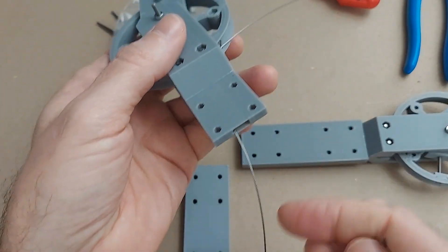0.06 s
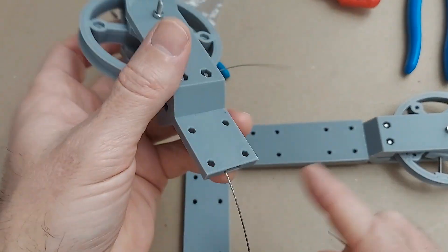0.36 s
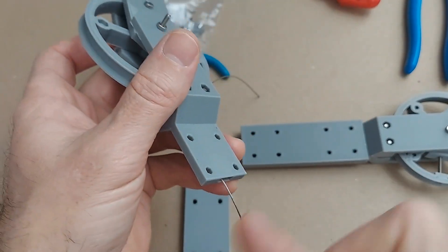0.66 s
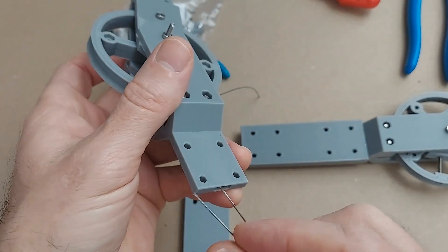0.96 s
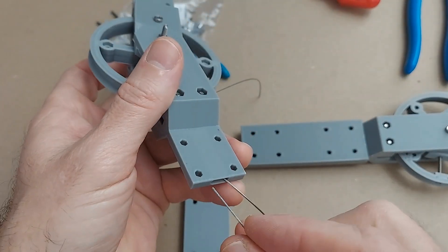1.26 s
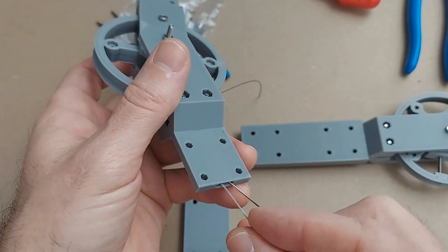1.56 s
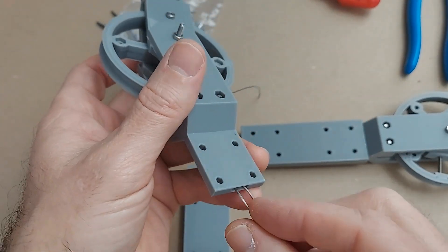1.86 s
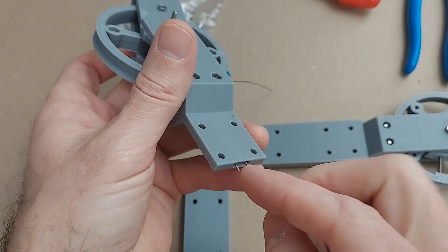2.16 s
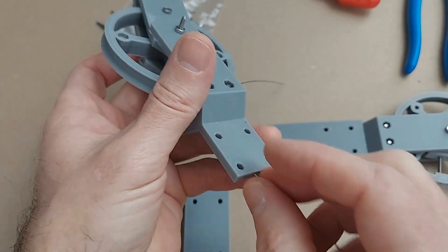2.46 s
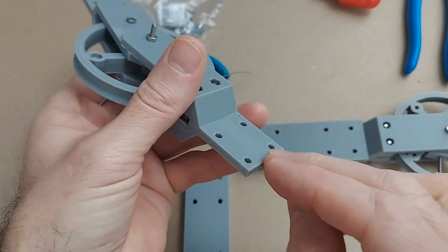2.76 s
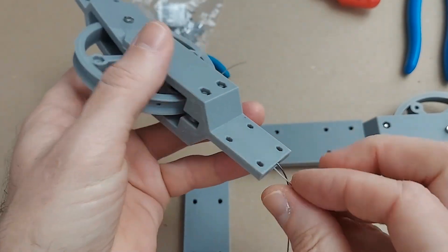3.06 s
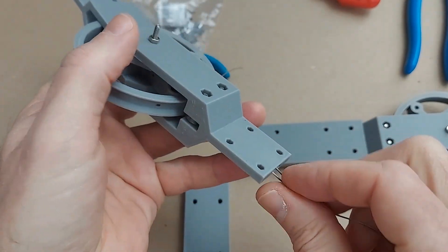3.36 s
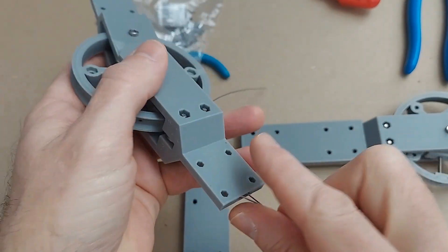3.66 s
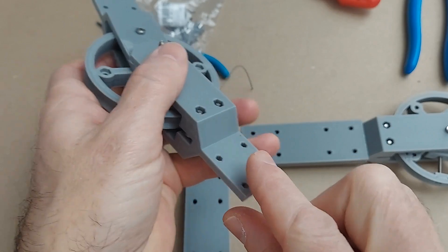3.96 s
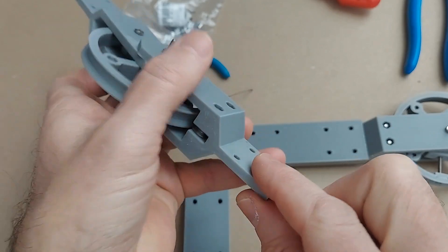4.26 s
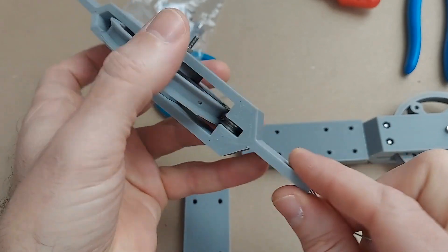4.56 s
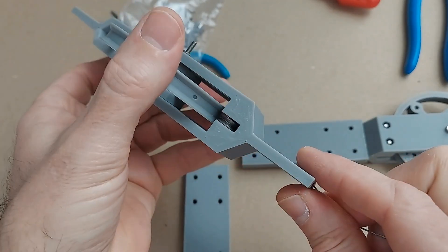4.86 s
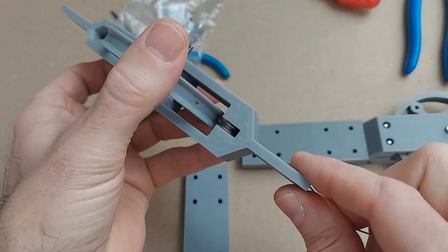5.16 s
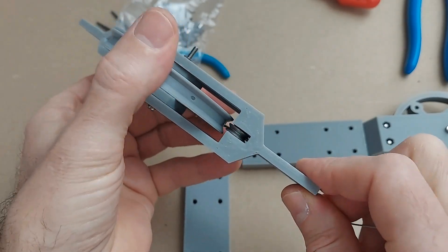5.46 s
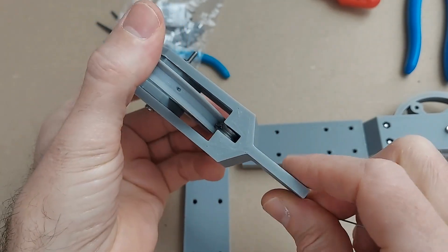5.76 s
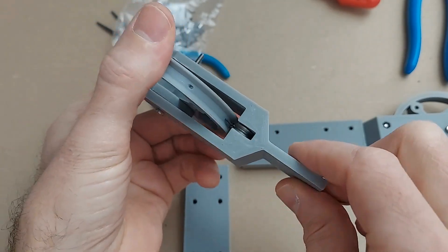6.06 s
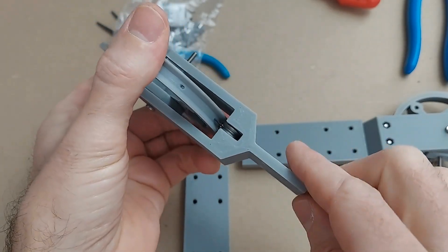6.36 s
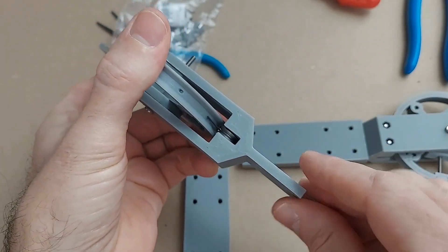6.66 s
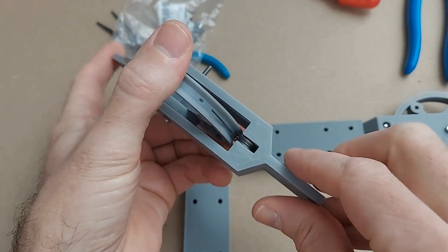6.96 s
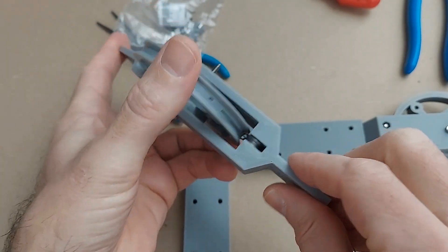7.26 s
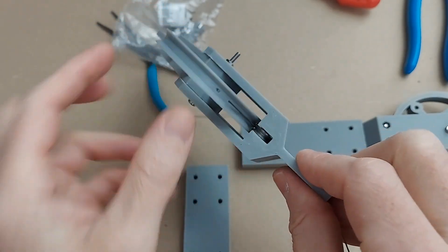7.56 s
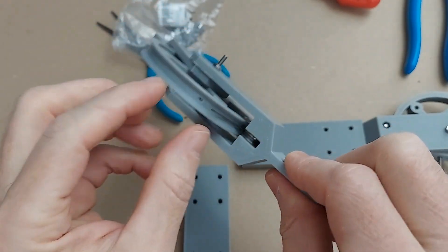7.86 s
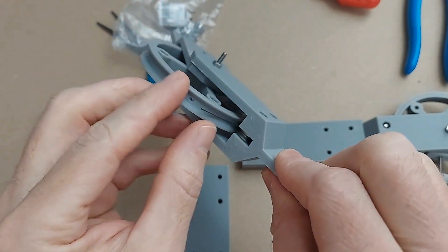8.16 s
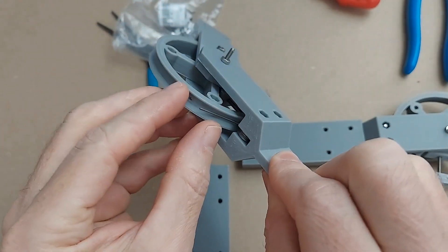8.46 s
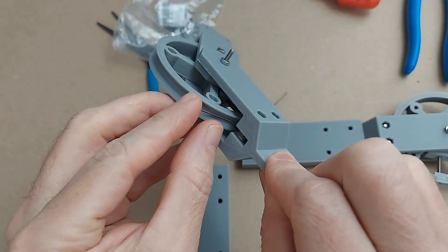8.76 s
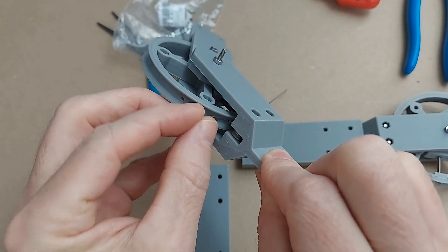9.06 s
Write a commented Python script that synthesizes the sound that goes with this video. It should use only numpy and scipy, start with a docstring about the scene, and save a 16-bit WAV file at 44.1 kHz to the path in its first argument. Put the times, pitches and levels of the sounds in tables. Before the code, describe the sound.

Close, sharp clicks and short scrapes of thin wire in a plastic pulley, with finger rubs and light wheel knocks in a quiet room.

```python
"""A thin steel cable is threaded by hand through a plastic pulley bracket, close by in a small room.
The cable scrapes and ticks in its channel, catches and snaps free, and twice its loose end rings.
Hands bump and rub the plastic, the wheel knocks in its frame and squeaks once against a fingertip.
Forearms slide on the bench now and then; under it all lies a low room rumble."""
import sys
import numpy as np
from scipy import signal
from scipy.fft import rfft, irfft
from scipy.io import wavfile

SR = 44100
rng = np.random.default_rng(int(sys.argv[2]) if len(sys.argv) > 2 else 0)


def log_audio(samples):
    """Write samples as a 16-bit WAV file to the path given in sys.argv[1]."""
    # one column per channel
    frames = np.atleast_2d(samples).T
    # limit to full scale, then quantise
    limited = np.clip(frames, -1, 1)
    pcm = np.round(limited * 32767).astype(np.int16)
    wavfile.write(sys.argv[1], SR, pcm)


N = 405264
TIME = np.arange(N) / SR

# the cable is pushed or pulled through its channel: (start [s], end [s], level [dB], extra treble [dB])
SLIDES = [(0.039, 0.234, -52, 9.5), (0.19, 0.793, -51.5, 1.5), (0.594, 0.623, -37.5, 7),
          (0.736, 1.075, -58.5, 1.5), (1.687, 2.104, -58, -11), (2.34, 2.46, -51.5, -6),
          (2.448, 2.539, -36, -3), (2.698, 2.811, -41.5, -2.5), (2.843, 3.033, -42, 0.5),
          (2.89, 2.929, -34.5, 4), (2.963, 3.005, -40, -5), (3.051, 3.259, -42.5, -3.5),
          (3.267, 3.38, -44.5, -2), (3.283, 3.303, -34.5, 3), (3.511, 3.575, -36, -15),
          (3.649, 3.696, -44.5, -8), (3.785, 3.821, -37, -2), (3.895, 4.076, -48, 1),
          (4.183, 4.301, -46, -11), (4.662, 4.735, -36, 1), (5.737, 5.797, -43.5, 7.5),
          (6.148, 6.28, -45, -6), (6.252, 6.663, -62.5, 2), (6.624, 6.795, -44.5, -1),
          (6.789, 6.909, -39, -4), (9.103, 9.2, -43, -12)]


def gain_of(db):
    """Turns decibels into a factor to multiply a sound by."""
    return 10 ** (np.asarray(db) / 20)


def evened(x):
    """Scales a signal to an average (rms) size of 1."""
    return x / np.sqrt(np.mean(x ** 2) + 1e-20)


def read(points, hz):
    """Reads between the rows of a (frequency, value) table, on a log-frequency scale."""
    f, value = np.transpose(points)
    return np.interp(np.log(hz + 1), np.log(f + 1), value)


def add(mix, s, sound):
    """Mixes a sound in at s seconds."""
    part = mix[max(round(s * SR), 0):][:len(sound)]
    part += sound[:len(part)]


def drift(hz):
    """A smooth random wobble with up to about hz changes a second."""
    keep_slow = np.exp(-(np.fft.rfftfreq(N, 1 / SR) / hz) ** 2)
    return evened(irfft(rfft(rng.standard_normal(N)) * keep_slow, N))


def resonate(x, hz, width_hz):
    """Makes x ring near the pitch curve hz, by passing it twice through one resonance."""
    turn = np.exp(2j * np.pi * np.cumsum(hz) / SR)
    decay = np.exp(-np.pi * width_hz / SR)
    for _ in range(2):
        x = 2 * (turn * signal.lfilter([1 - decay], [1, -decay], x / turn + 1e-18)).real
    return evened(x)


def split(x, edges_hz=(5300, 11000), order=8):
    """Cuts a sound into low, middle and top bands that add up to the whole."""
    hz, spectrum = np.fft.rfftfreq(len(x), 1 / SR), rfft(x)
    low, below_top = (1 / (1 + (hz / edge) ** (2 * order)) for edge in edges_hz)
    return [irfft(spectrum * share, len(x)) for share in (low, below_top - low, 1 - below_top)]


def grip(s):
    """How the hands hold things at s seconds: 0 loose cable, 1 pinched cable, 2 wheel."""
    # fingers pinch the cable and damp it, then take hold of the wheel: (time [s])
    changes = [4.2, 8.3]
    return np.searchsorted(changes, s)


def bracket(held_modes, contact_db, size=2048):
    """The bracket's answer to one tap: the bare contact plus the ringing of frame and held part."""
    # tone of the bare contact: (frequency [Hz], level [dB])
    contact = [(100, -28), (350, -11.5), (700, -10.5), (1400, -8.5), (2600, 1.5), (4400, 0), (6500, 3),
               (10000, 1), (16000, -11)]
    # resonances of the bracket with the cable in it: (pitch [Hz], width [Hz], level [dB])
    frame_modes = [(450, 43, -15.5), (980, 190, -6.5), (1620, 85, -21), (2140, 320, -1.5),
                   (2660, 340, -2.5), (3100, 220, 4), (3490, 350, 3.5), (4550, 430, 2)]
    hz = abs(np.fft.fftfreq(size, 1 / SR))
    power = gain_of(read(contact, hz) + contact_db) ** 2
    for pitch, width, db in frame_modes + held_modes:
        detuning = (hz ** 2 - pitch ** 2) / (width * hz + 1)
        power += gain_of(db) ** 2 / (1 + detuning ** 2)
    spectrum = np.exp(np.conj(signal.hilbert(np.log(power) / 2)))  # nothing rings before the tap
    return np.fft.ifft(spectrum).real[:size // 2]


def grip_bodies(contact_db):
    """How the bracket rings in each of the three grips."""
    # resonances of the part in hand: (pitch [Hz], width [Hz], level [dB])
    loose_cable = [(5910, 56, 13.5), (6060, 190, 13), (6950, 430, 12), (7260, 420, 3.5), (7700, 300, 2),
                   (9240, 880, 13), (13540, 280, 9.5), (14460, 100, 2.5), (15400, 250, 8)]
    pinched_cable = [(2530, 200, -2), (5950, 100, 7), (6830, 1100, 3), (9090, 210, 5.5), (10540, 400, -3.3),
                     (12300, 130, 0.5), (14400, 750, 2), (15200, 340, -1)]
    wheel = [(3440, 190, 11.5), (4140, 330, 7), (4610, 250, 15), (5100, 240, -1), (5520, 320, 7),
             (6730, 330, 1.5), (8140, 270, 7)]
    return [bracket(modes, contact_db + extra_db)
            for modes, extra_db in ((loose_cable, -2.5), (pinched_cable, 1.5), (wheel, -1.5))]


def slips(count, per_s, spread_db):
    """Surfaces stick and slip, giving tiny kicks at random times and of random size."""
    chance, size, sign = rng.random(count), rng.exponential(1, count), rng.choice([-1, 1], count)
    return sign * (chance < per_s / SR) * gain_of(spread_db * np.minimum(size, 4))


def spot(x, ripple_db=5, points=48):
    """Each contact spot favours some resonances and misses others."""
    ripple = evened(rng.standard_normal(points))
    hz = np.fft.rfftfreq(len(x), 1 / SR)
    shape = np.interp(np.sqrt(hz / hz[-1]), np.linspace(0, 1, points), ripple)
    return irfft(rfft(x) * gain_of(ripple_db * shape), len(x))


def strokes(rows, bodies, bands_db, judder_db, smooth, fade_share, ring_hz=None):
    """Steel strands or skin snag on ridged plastic: juddering slips over a smooth rub."""
    snags = evened(slips(N, per_s=900, spread_db=3.8))
    glide = smooth * rng.standard_normal(N)
    judder = gain_of(judder_db * drift(41))
    wander = 1 + 0.019 * drift(25)
    out = np.zeros(N)
    for start, end, db, treble_db in rows:
        span = slice(max(round(start * SR), 0), round(max(end, start + .005) * SR))  # at least 5 ms
        grit = gain_of(.35 * min(db + 40, 0))  # strokes lighter than -40 dB snag less
        push = (grit * snags[span] + glide[span]) * judder[span]
        rub = evened(signal.fftconvolve(push, bodies[grip(start)])[:len(push)])
        travel = np.linspace(0, 1, len(push))  # the contact moves from one spot to another
        rub = sum(share * spot(rub) for share in (travel, 1 - travel))
        if ring_hz:
            rub += gain_of(-9) * resonate(push, ring_hz[grip(start)] * wander[span], width_hz=800)
        levels = db + np.add(bands_db, [0, 0, treble_db])
        stroke = sum(gain_of(level) * evened(band) for level, band in zip(levels, split(rub)))
        add(out, start, stroke * signal.windows.tukey(len(push), fade_share))
    return out


def add_click(mix, s, body, levels, drag_ms, chatter_ms, per_s, snap, size=2048):
    """A contact drags for an instant, snaps free at s seconds and chatters against the plastic."""
    lead_s = .01
    t = np.arange(size) / SR - lead_s
    drag_s, chatter_s = np.maximum([drag_ms, chatter_ms], .05) / 1000
    drag = 0.84 * np.exp(-(t / drag_s) ** 2)
    chatter = np.exp(-abs(t) / chatter_s) * (t < 1.3 * lead_s)
    force = evened(slips(size, per_s, spread_db=3.5)) * np.where(t < 0, drag, chatter)
    force[round(lead_s * SR)] += snap * np.sqrt(SR / 1000)
    bands = split(spot(signal.fftconvolve(force, body)[:size]))
    # each level is the energy of the blow in one band, as if spread over 10 ms
    click = sum(gain_of(db) * band * np.sqrt(.01 * SR / np.sum(band ** 2))
                for db, band in zip(levels, bands))
    add(mix, s - lead_s, click)


def rumble(trim_db=-1):
    """Low room noise with a few faint, wavering tones."""
    # tone of the room noise: (frequency [Hz], level [dB])
    colour = [(20, -42), (40, -4.5), (75, -3.5), (98, 3.5), (125, -3.5), (158, -9.5), (200, -11),
              (260, -11), (310, -19), (420, -28), (600, -30), (1000, -44), (1600, -44.5), (2300, -49),
              (5000, -45), (16000, -52)]
    # its slow rise and fall: (time [s], level [dB])
    swell = [(0, -40.5), (.5, -38), (1.7, -41), (2.2, -38), (5.2, -39.5), (6.2, -40.5), (9.19, -40.5)]
    # tones in the room: (pitch [Hz], level [dB])
    hum = [(97, -51), (353, -58.5), (9376, -73)]
    shape = gain_of(read(colour, np.fft.rfftfreq(N, 1 / SR)))
    noise = evened(irfft(rfft(rng.standard_normal(N)) * shape, N))
    tones = sum(gain_of(db + 2 * drift(16)) * np.sin(2 * np.pi * hz * TIME + 1.1 * drift(4.7))
                for hz, db in hum)
    level_db = np.interp(TIME, *np.transpose(swell))
    return gain_of(level_db + trim_db) * noise + tones


def ticks(body, stray_db=-63, sliding_db=-50):
    """Faint stray ticks of cable and fingernails, with more of them while the cable slides."""
    fidgeting = (TIME < 1.1) | ((TIME > 1.62) & (TIME < 7.8))
    sliding = sum((TIME > start) * (TIME < end) * gain_of(min(db + 38.5, 0))
                  for start, end, db, _ in SLIDES)
    sparse = evened(signal.oaconvolve(slips(N, per_s=20, spread_db=-0.5), body)[:N])
    dense = evened(signal.oaconvolve(slips(N, per_s=78, spread_db=4), body)[:N])
    return gain_of(stray_db) * fidgeting * sparse + gain_of(sliding_db) * sliding * dense


def cable_scrapes(bodies):
    """The cable's strands scrape through the channel, and the steel sings a little."""
    # tone of a scrape, by band: (low [dB], middle [dB], top [dB])
    bands_db = [-6.5, -1, 0]
    # pitch of the rubbed steel, by grip: (loose [Hz], pinched [Hz], wheel [Hz])
    ring_hz = [6060, 9120, 9200]
    return strokes(SLIDES, bodies, bands_db, judder_db=4, smooth=0.73, fade_share=0.26, ring_hz=ring_hz)


def arm_slides(pitch_rise=0.061):
    """A forearm rubs the bench top, louder and a little higher as it speeds up, then easing off."""
    # slides of the forearm: (start [s], end [s], level [dB])
    moves = [(0.329, 0.72, -42.5), (.66, 1.054, -46), (1.2, 5, -56.5), (8.3, 8.6, -53)]
    # resonances of the bench: (pitch [Hz], width [Hz], level [dB])
    bench_modes = [(384, 154, -1.5), (474, 26, -23), (798, 220, -12.5), (830, 110, -27)]
    speeds = [np.sin(np.pi * np.clip((TIME - start) / (end - start), 0, 1)) for start, end, _ in moves]
    rub = rng.standard_normal(N)
    bend = 1 + pitch_rise * (sum(speeds) - .5)
    wood = sum(gain_of(db) * resonate(rub, hz * bend, width) for hz, width, db in bench_modes)
    loudness = sum(gain_of(db) * speed for (_, _, db), speed in zip(moves, speeds))
    return loudness * evened(wood)


def cable_catches(bodies):
    """Bright clicks of steel on plastic: the longer the cable drags, the longer it chatters."""
    # the cable catches and snaps free: (time [s], level [dB], extra low band [dB], drag [ms])
    catches = [(.576, -33.5, -8.5, 0.18), (.6, -23.5, -12, 2.2), (0.634, -30.5, -11.5, .1),
               (.933, -38, -9, 0.089), (.969, -29, -12, 2.3), (1.0576, -18, -13.5, 5.7),
               (1.6302, -46, -26, .1), (1.6952, -38, -20, 0.17), (2.0802, -39, -5, .2),
               (2.085, -34.5, -4.5, 0.43), (2.246, -29.5, -13.5, 0.26), (2.352, -35, -10, .1),
               (2.512, -33.5, -8, 1.1), (2.551, -31.5, -6.5, 0.3), (2.5704, -33, -6.5, .1),
               (2.6166, -24.5, -9.5, 0.081), (2.919, -18.5, -19, 8.3), (2.9627, -28, -22, 0.18),
               (2.9725, -31, -21, 0.36), (2.984, -27, -16, 5.9), (3.084, -31, -22, 3.8),
               (3.123, -34.5, -10.5, 2), (3.272, -30, -13, 1), (3.3, -29.5, -11, 2.3),
               (3.339, -29.5, -11.5, 0.98), (3.371, -38.5, -4, 1.4), (3.425, -44.5, -10, .2),
               (3.4464, -34, -11.5, .2), (3.454, -37.5, -9, .2), (3.524, -18, -4.5, 3),
               (3.534, -23.5, -9, 1.3), (3.5388, -22.5, -27, .3), (3.559, -24, -10.5, .5),
               (3.6229, -33.5, -11, .2), (3.7073, -35, -8.5, 0.46), (3.7562, -34.5, -8.5, .1),
               (3.8087, -27.5, -3.5, 1.3), (3.8618, -23, -10.5, .1), (3.87, -33.5, -4, .4),
               (3.9067, -31.5, -11, 0.35), (3.922, -31, -5, 8), (3.9568, -29, -7.5, 1.5),
               (4.0034, -31.5, -5, .2), (4.015, -21.5, -7.5, 1.2), (4.219, -34.5, -7, 1),
               (4.275, -38.5, -5, 0.36), (4.5898, -26.5, -20, 0.11), (4.7198, -22, -7.5, 2.6),
               (5.016, -37.5, -5, 0.54), (5.0864, -42, -5.5, .6), (5.133, -47, -9, .1),
               (5.352, -41, -4, 5.9), (5.391, -25, -8.5, 2.8), (5.5568, -32, -19, 0.085),
               (5.57, -42, -9, .8), (5.648, -41, -4, 0.84), (5.75, -39, -11, 1.7), (5.9256, -21, -5.5, 2.7),
               (6.187, -21.5, -11, 3.9), (6.387, -36.5, -11, .2), (6.511, -38.5, -16, 0.23),
               (6.652, -40, -18, .4), (6.8044, -36, -12, .2), (6.847, -32, -11, .8), (7.013, -37, -5, .2),
               (7.031, -36.5, -3, 1.4), (7.6066, -36.5, -13, .5), (7.6338, -42.5, -7, .5),
               (8.157, -41, -0.5, 0.059)]
    # extra top band of a catch, by grip: (loose [dB], pinched [dB], wheel [dB])
    top_db = [-1.5, 3.5, 1]
    out = np.zeros(N)
    for s, db, low_db, drag_ms in catches:
        levels = db + np.array([low_db, 0, top_db[grip(s)]])
        chatter_ms = 2.1 + 0.5 * drag_ms
        add_click(out, s, bodies[grip(s)], levels, drag_ms, chatter_ms, per_s=11000, snap=.6)
    return out


def cable_twangs():
    """The cable's free end is let go and rings thinly."""
    # moments of letting go: (time [s], level [dB])
    releases = [(.6, -43), (1.057, -60)]
    # tones of the free end: (pitch [Hz], level [dB], time to fade by 60 dB [s])
    wire_modes = [(4533, -8, 0.86), (4950, -13, 0.76), (5959, 1, .3), (7260, -6, .2)]
    t, out = np.arange(SR) / SR, np.zeros(N)
    ring = sum(gain_of(db - 60 * t / fade_s) * np.sin(2 * np.pi * hz * t)
               for hz, db, fade_s in wire_modes)
    for s, db in releases:
        add(out, s, gain_of(db) * ring)
    return out


def hand_bumps(rise_s=0.002, fade_s=0.039, boost_db=4):
    """Hands push on the bracket, making soft, low thuds that die at once."""
    # pushes of the hands: (time [s], level [dB], pitch [Hz])
    bumps = [(0.602, -28.5, 165), (4.968, -29.5, 161), (5.103, -19.5, 136), (5.116, -32, 240),
             (5.643, -29.5, 269), (5.658, -26, 140), (5.926, -35, 207)]
    t, out = np.arange(6000) / SR, np.zeros(N)
    rise = 1 - np.exp(-t / rise_s)
    for s, db, hz in bumps:
        add(out, s, rise * gain_of(db + boost_db - 60 * t / fade_s) * np.sin(2 * np.pi * hz * t))
    return out


def finger_rubs(bodies):
    """Skin drags over the plastic as the fingers shift, duller than the cable's scrape."""
    # shifts of the fingers: (start [s], end [s], level [dB], extra treble [dB])
    rubs = [(1.7, 4.9, -67, 0), (5.85, 7.1, -65, 0), (3.43, 3.52, -51.5, -3), (4, 3.95, -55, 7),
            (4.136, 4.173, -48, 3), (4.3, 4.515, -46, -10), (4.495, 4.63, -48, 4), (4.755, 4.92, -59.5, 10),
            (5.36, 5.41, -44.5, -3), (5.48, 5.84, -55.5, 2), (5.995, 6.11, -59, 2), (6.875, 7.1, -59.5, -1),
            (7.18, 7.345, -62.5, 1), (7.353, 7.47, -46, 1), (8.06, 8.23, -64, 0), (8.26, 8.325, -46.5, 8),
            (8.365, 8.39, -55.5, 8), (8.54, 8.66, -66, -4), (8.66, 8.755, -59.5, 2), (8.822, 8.857, -52, 0),
            (8.88, 9, -69, -7), (9.1, 8.9, -43, 6)]
    # tone of a rub, by band: (low [dB], middle [dB], top [dB])
    bands_db = [2.5, 1, -6.5]
    return strokes(rubs, bodies, bands_db, judder_db=3, smooth=0.56, fade_share=0.32)


def wheel_knocks(bodies):
    """The wheel hits its frame: a duller clack of plastic on plastic with a short rattle."""
    # knocks of the wheel: (time [s], level [dB], brightness [dB])
    knocks = [(2.094, -39.5, -4), (3.186, -34, 0), (4.6114, -32.5, 2), (5.158, -50, -16),
              (5.2334, -47.5, -7), (5.381, -27.5, 2.5), (5.625, -35.5, -6.5), (6.127, -47.5, 6),
              (6.939, -45.5, 11.5), (7.1913, -40.5, -2), (7.5608, -54.5, 2), (7.781, -52, 0.5),
              (7.855, -53.5, 3), (7.928, -55, 6.5), (8.099, -44.5, -1), (8.296, -41, 10.5),
              (8.4881, -24.5, -0.5), (9.055, -45.5, -7), (9.114, -33, 6)]
    out = np.zeros(N)
    for s, db, bright_db in knocks:
        levels = db + np.array([0, bright_db, bright_db - 16])
        add_click(out, s, bodies[grip(s)], levels, drag_ms=0.45, chatter_ms=5.9, per_s=2700, snap=1.1)
    return out


def wheel_squeak(start_s=8.413, length_s=0.0064, hz=1650, db=-41):
    """The wheel chirps once as a fingertip slips on it."""
    size, out = round(length_s * SR), np.zeros(N)
    chirp = resonate(rng.standard_normal(size), np.full(size, hz), width_hz=500)
    add(out, start_s, gain_of(db) * chirp * signal.windows.hann(size))
    return out


def room_echo(x, first_s=0.0025, echoes_per_s=3000, size=20000):
    """Sound bounces off bench and walls; the high notes die away first."""
    # how long the room rings: (frequency [Hz], time to fade by 60 dB [s])
    fade_times = [(200, 0.59), (1300, 0.54), (3500, 0.26), (9000, 0.14), (16000, 0.098)]
    echoes = rng.choice([-1., 1.], size) * (rng.random(size) < echoes_per_s / SR)
    echoes *= np.arange(size) > first_s * SR
    hz, t, spectra = signal.stft(echoes, SR, nperseg=256)
    fade = gain_of(-60 * t / read(fade_times, hz)[:, None])
    tail = signal.istft(spectra * fade, SR, nperseg=256)[1]
    return signal.oaconvolve(x, tail / np.linalg.norm(tail))[:N]


def scene():
    """The handling sounds with their echo, the forearms and the rumble, alike in both channels."""
    struck, rubbed = grip_bodies(contact_db=-1.5), grip_bodies(contact_db=8)
    handling = cable_scrapes(rubbed) + finger_rubs(rubbed)
    handling += cable_catches(struck) + wheel_knocks(struck) + cable_twangs() + wheel_squeak()
    handling += ticks(struck[1]) + hand_bumps()
    mono = handling + gain_of(-11.5) * room_echo(handling) + arm_slides() + rumble()
    return np.array([mono, mono])


def record(dry):
    """Cuts away the very highest treble, above about 16 kHz."""
    low_pass = signal.firwin(301, 16050, window=("kaiser", 8), fs=SR)
    return signal.oaconvolve(dry, low_pass[None], "same")


dry = scene()
out = record(dry)
log_audio(out)
```